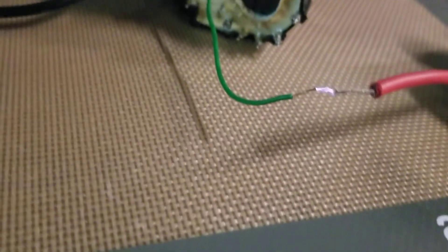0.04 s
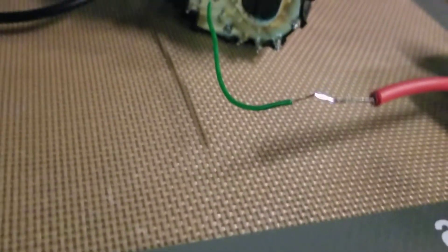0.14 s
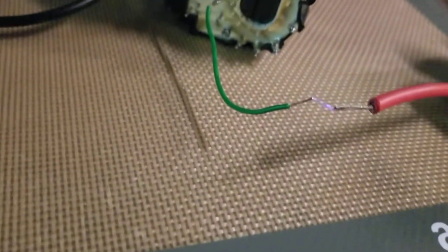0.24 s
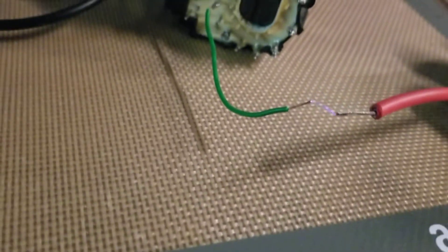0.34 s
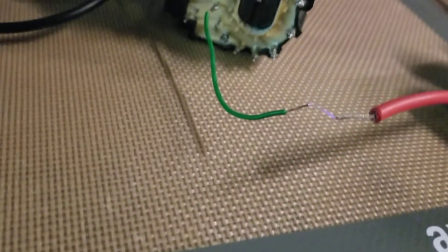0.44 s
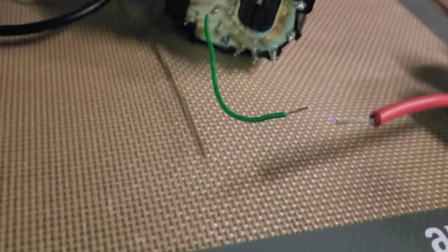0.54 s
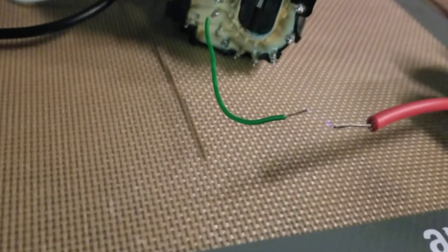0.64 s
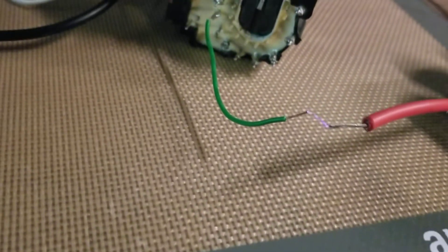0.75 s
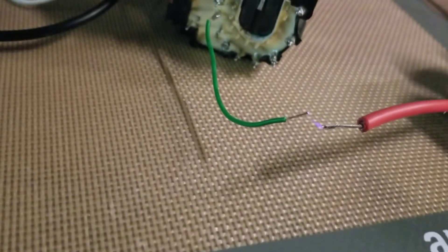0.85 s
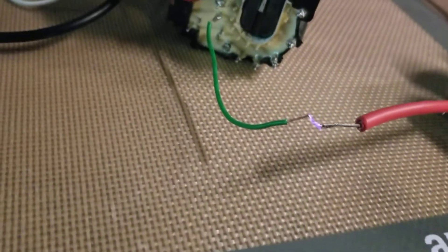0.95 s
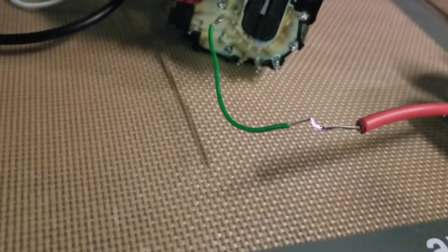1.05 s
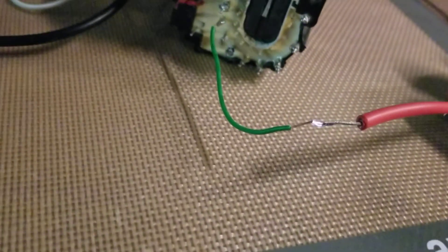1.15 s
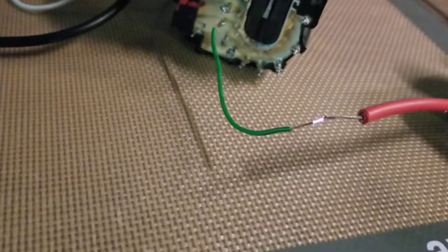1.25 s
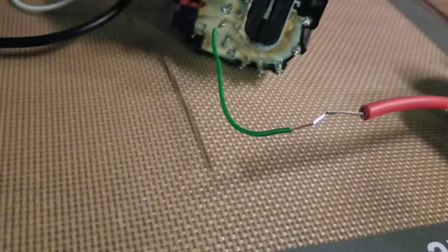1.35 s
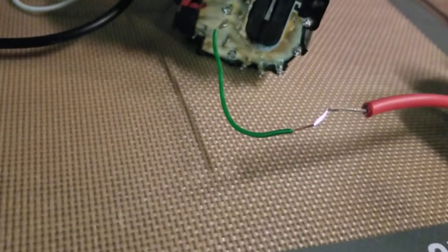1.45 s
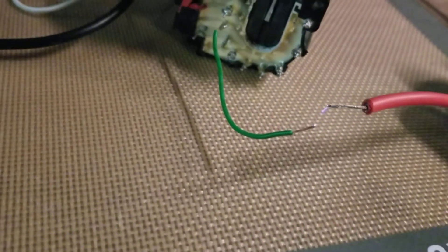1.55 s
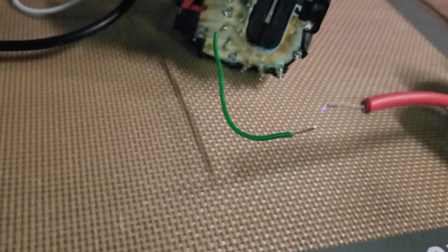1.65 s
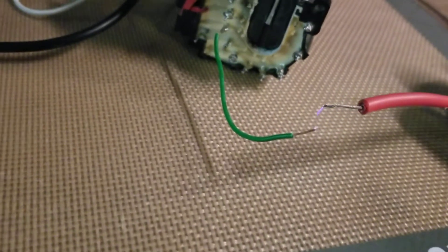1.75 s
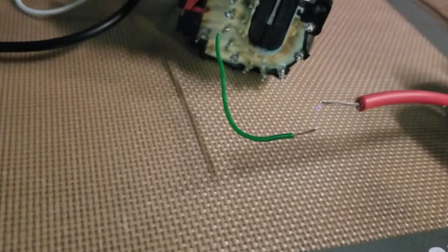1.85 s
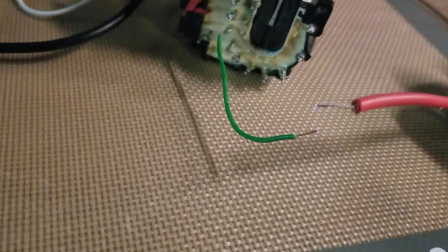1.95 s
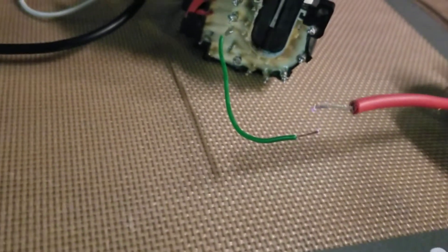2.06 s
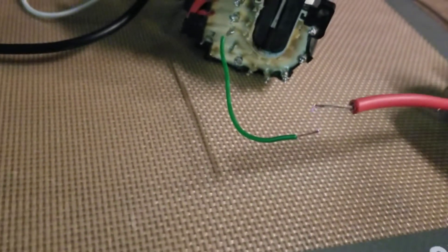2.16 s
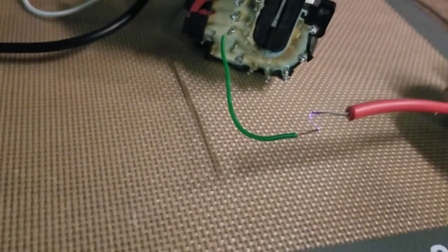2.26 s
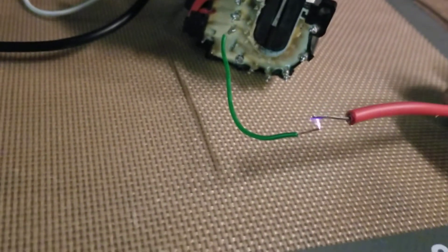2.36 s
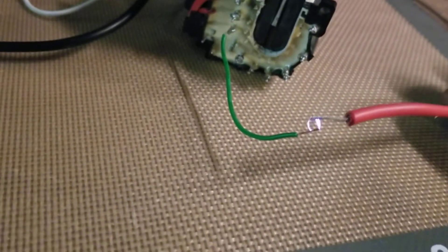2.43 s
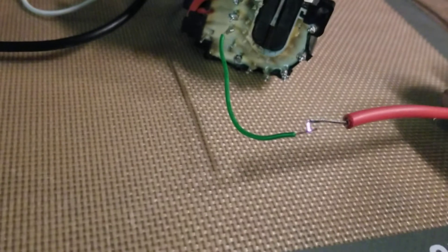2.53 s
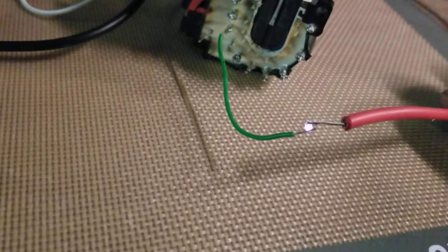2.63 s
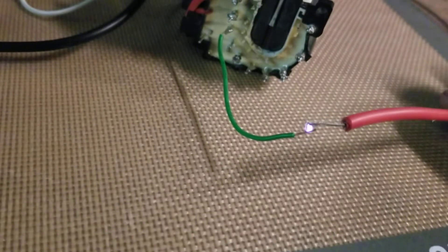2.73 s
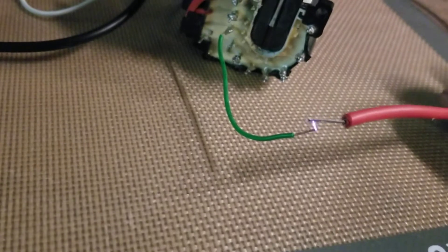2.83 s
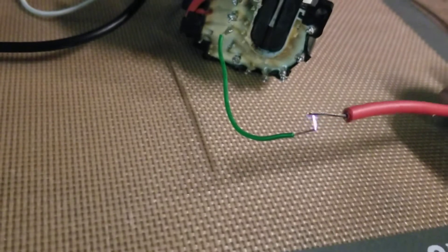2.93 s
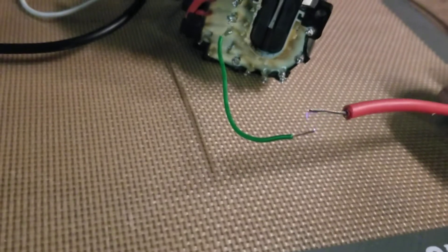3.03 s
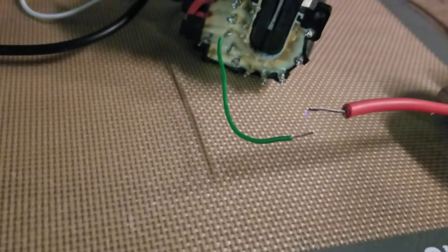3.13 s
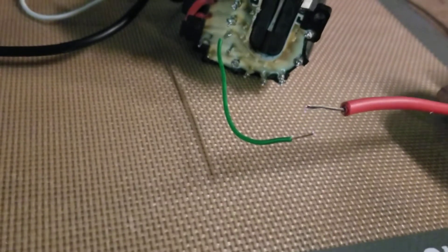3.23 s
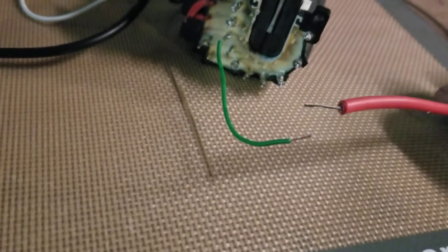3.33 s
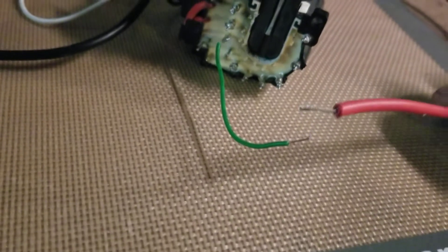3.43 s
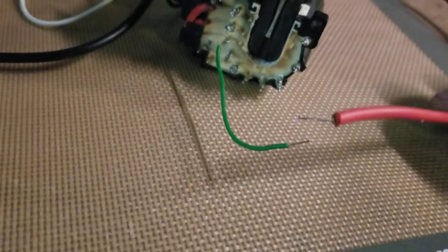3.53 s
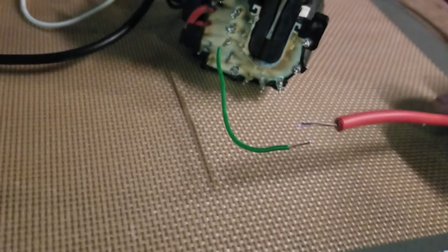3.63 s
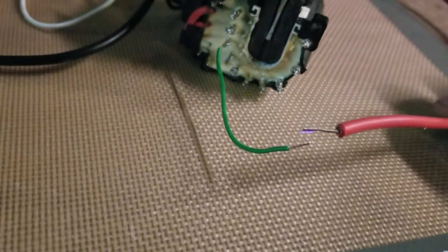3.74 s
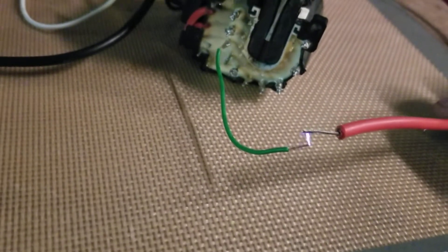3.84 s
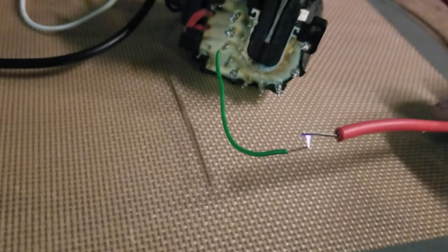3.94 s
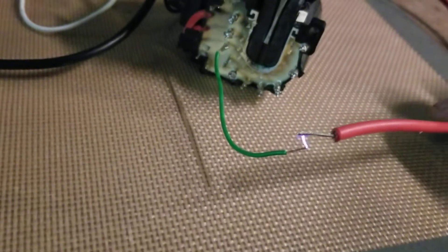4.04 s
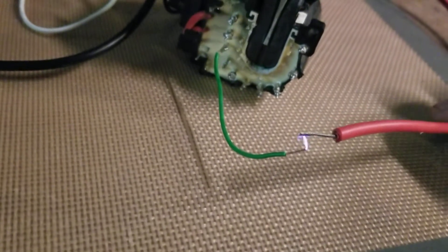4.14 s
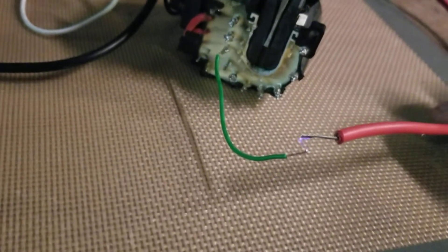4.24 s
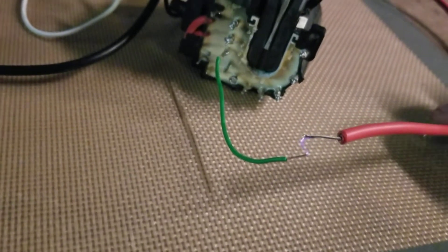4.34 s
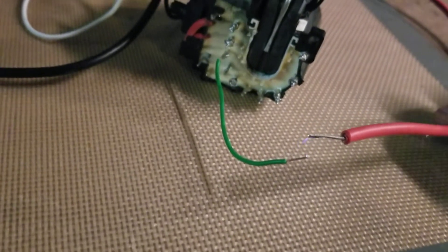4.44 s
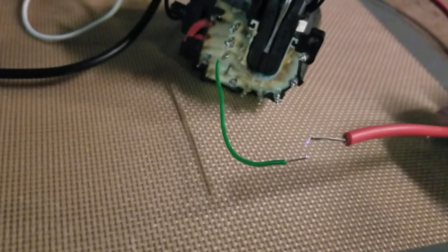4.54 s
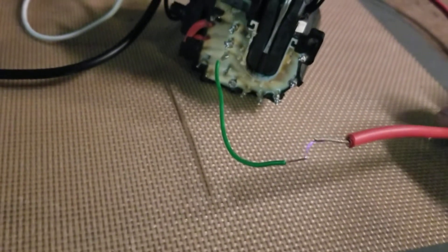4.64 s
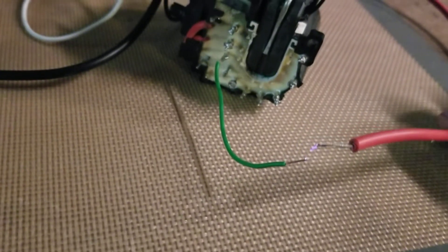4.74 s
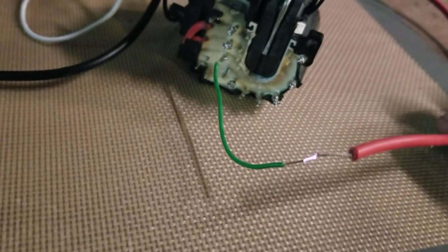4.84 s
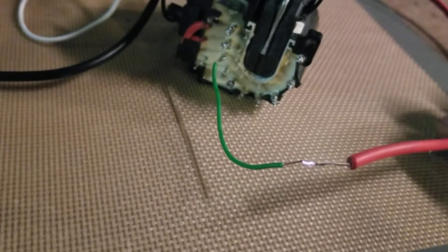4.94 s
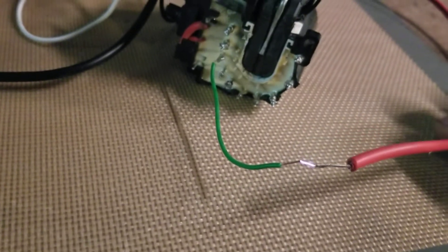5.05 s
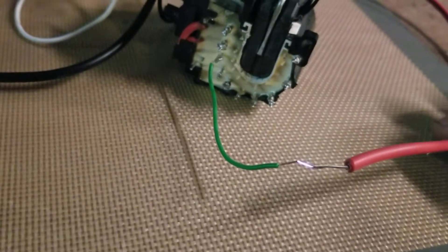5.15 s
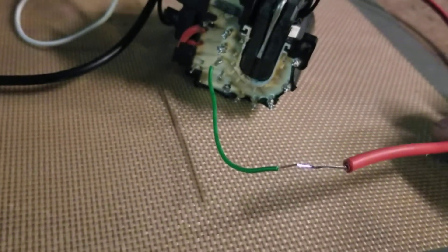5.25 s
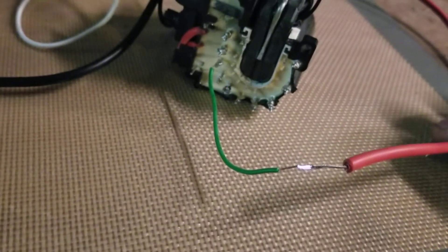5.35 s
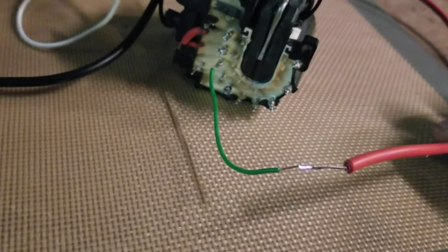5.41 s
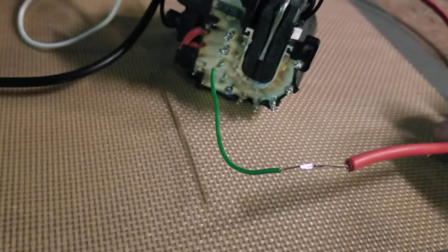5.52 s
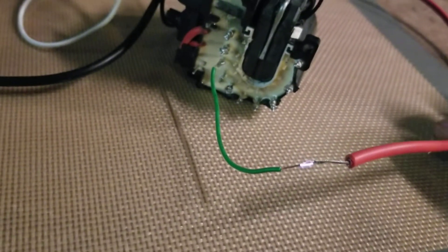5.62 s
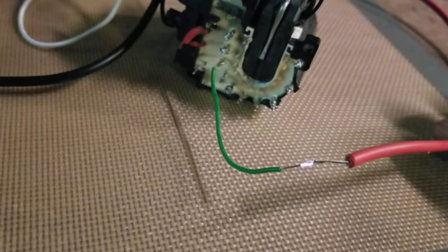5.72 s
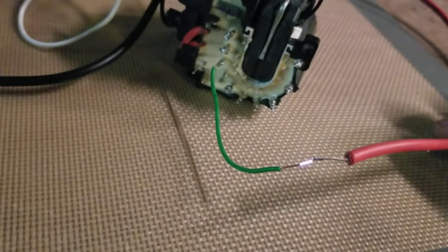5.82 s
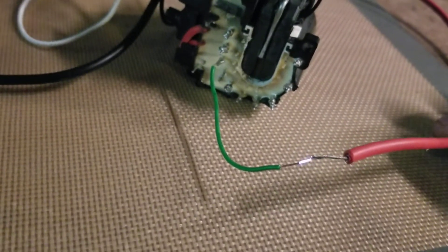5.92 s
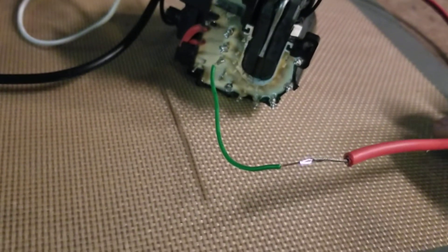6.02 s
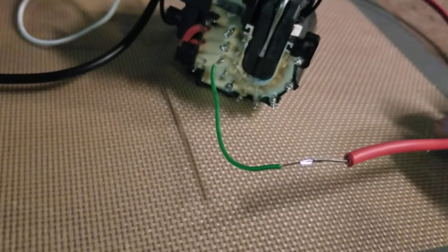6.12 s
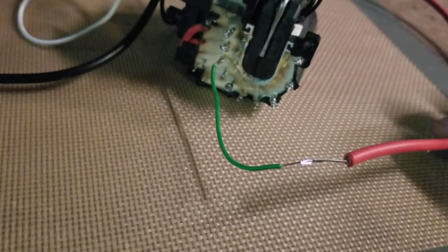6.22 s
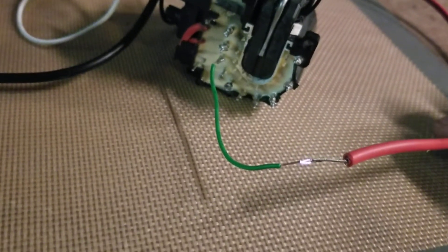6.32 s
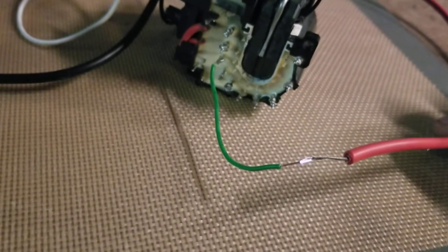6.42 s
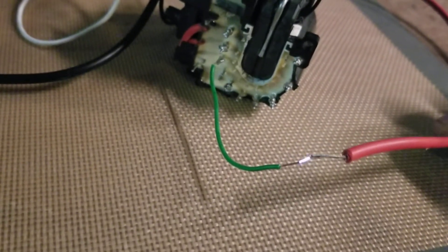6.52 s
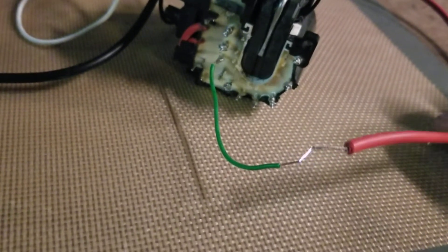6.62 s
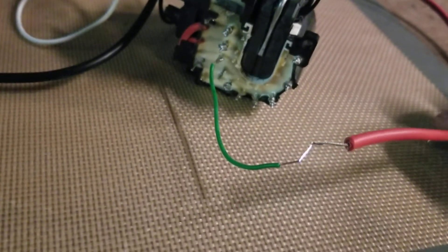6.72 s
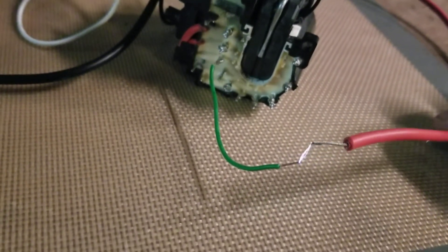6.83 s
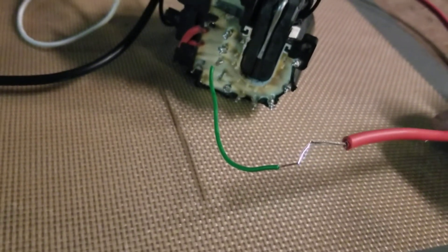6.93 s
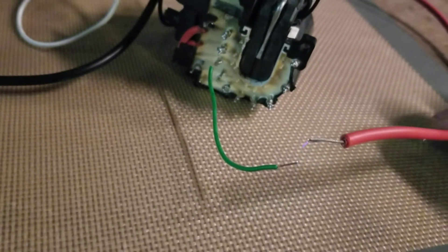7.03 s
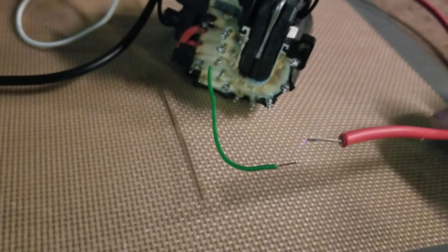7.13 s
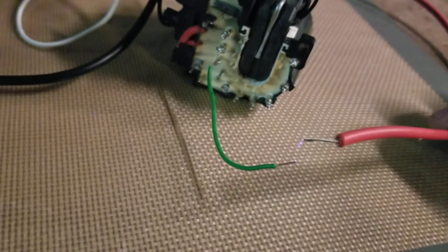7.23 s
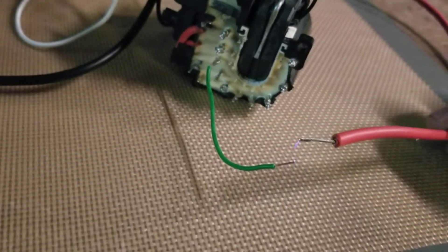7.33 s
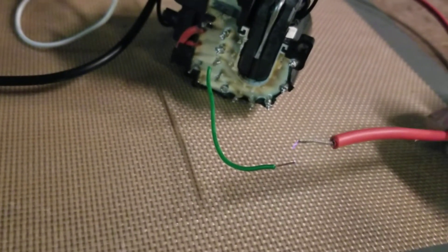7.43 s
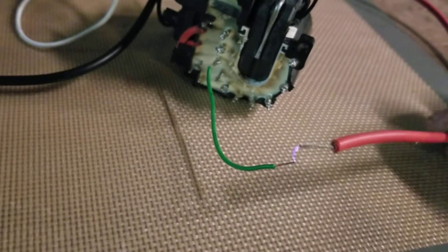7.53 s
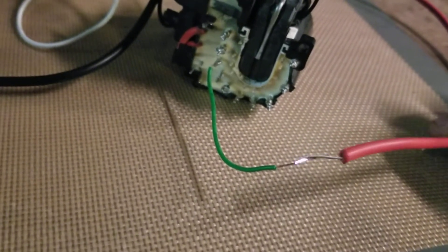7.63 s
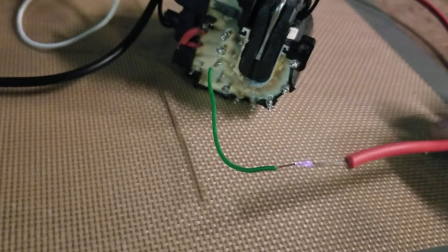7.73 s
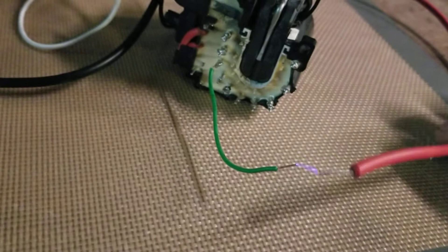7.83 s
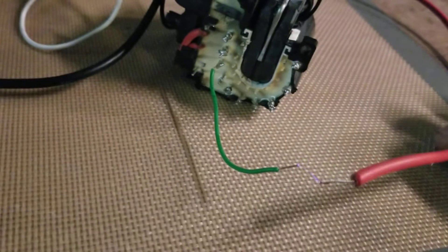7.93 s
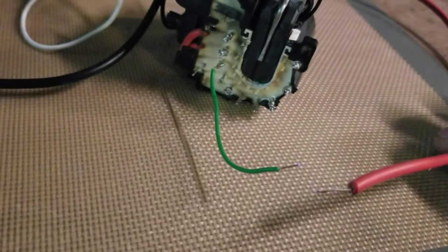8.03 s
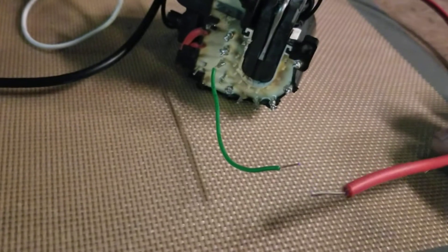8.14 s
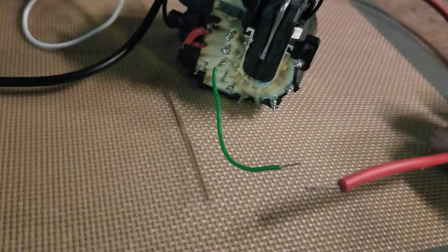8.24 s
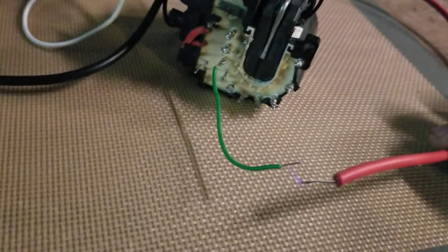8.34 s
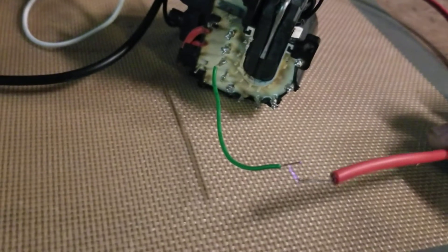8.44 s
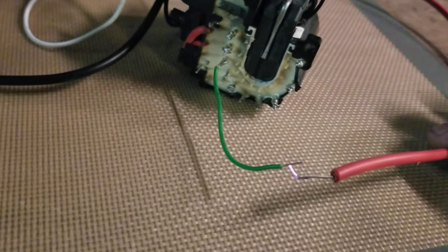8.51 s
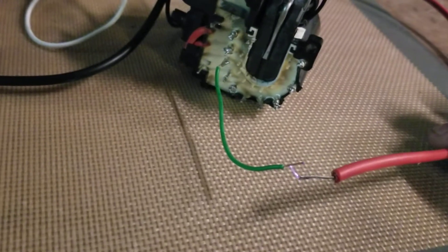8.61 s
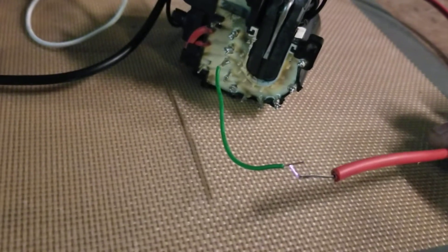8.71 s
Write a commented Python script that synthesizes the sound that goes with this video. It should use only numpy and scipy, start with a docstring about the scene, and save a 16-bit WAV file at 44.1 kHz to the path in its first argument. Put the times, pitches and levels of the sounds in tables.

```python
"""From the start a cooling fan hums in a small room: wavering tones and a swelling drone over rushing air.
A flyback transformer throws an arc between two wire ends, one moved by hand: two short burns come first.
Longer burns follow, the longest a little past halfway, then short ones. Each is a train of tiny sparks that
builds up, holds, sometimes sags and dies; its spark rate glides with the gap. Between and around the burns,
puffs of corona hiss. Stray sparks jump from strong corona, and single snaps come from about 4 s to the end."""
import sys
import numpy as np
from scipy import signal
from scipy.fft import rfft, irfft, next_fast_len
from scipy.io import wavfile
from scipy.ndimage import map_coordinates

SR = 44100
rng = np.random.default_rng(int(sys.argv[2]) if len(sys.argv) > 2 else 0)


def log_audio(samples):
    """Write samples as a 16-bit WAV file to the path given in sys.argv[1]."""
    # one column per channel
    frames = np.atleast_2d(samples).T
    # limit to full scale, then quantise
    limited = np.clip(frames, -1, 1)
    pcm = np.round(limited * 32767).astype(np.int16)
    wavfile.write(sys.argv[1], SR, pcm)


N = 386757


def amp(db):
    """Turn decibels into a gain."""
    return 10 ** (np.asarray(db) / 20)


def unit(x):
    """Scale x to an rms (average strength) of 1."""
    return x / np.sqrt(np.mean(x ** 2) + 1e-20)


def along(points, hz, axis=1):
    """Read one column of a frequency table, with frequency on a log scale."""
    table = np.transpose(points)
    return np.interp(np.log(hz + 1), np.log(table[0] + 1), table[axis])


def both_ears(points, hz):
    """Left and right gains from a table of f/Hz, left/dB, right/dB."""
    return amp([along(points, hz, axis=1), along(points, hz, axis=2)])


def curves(rows):
    """Join the points of each column after the time into one value per sample."""
    s, *columns = np.transpose(rows)
    t = np.arange(N) / SR
    return [np.interp(t, s, column) for column in columns]


def wobble(rate):
    """A smooth random curve around 0, drawn through `rate` random points a second."""
    points = rng.standard_normal(N // 16)
    return map_coordinates(points, [np.arange(N) * rate / SR], mode="wrap")


def filtered(x, response):
    """Shape the spectrum of x by a response that is a function of frequency."""
    size = next_fast_len(N + SR // 4)  # spare room, so that the end does not wrap onto the start
    spectrum = rfft(x, size) * response(np.fft.rfftfreq(size, 1 / SR))
    return irfft(spectrum, size)[..., :N]


def passband(hz, top_hz=15930):
    """Full gain up to the band limit, then a steep fall."""
    return 1 / (1 + (hz / top_hz) ** 300)


def pulses(times, sizes, size=8):
    """Band-limited impulses that may fall between samples."""
    at = np.asarray(times)[:, None] * SR
    index = np.floor(at).astype(int) + np.arange(1 - size, size + 1)
    window = np.cos(np.pi * (index - at) / (2 * size)) ** 2
    shape = np.sinc(index - at) * window
    # impulse parts outside the scene pile up at its edges; the spare last slot is cut off
    return np.bincount(np.clip(index, 0, N).ravel(), (shape * sizes[:, None]).ravel(), N + 1)[:N]


def bump(t, centre_s, length_s):
    """A smooth rise to 1 and back, length_s wide at half height."""
    return .5 ** ((2 * (t - centre_s) / length_s) ** 2)


def tone(hz, width_hz, waver_db=2.47):
    """A hum line of rms 1: a sine that wavers in pitch and level."""
    phase = np.cumsum(hz + width_hz / 2 * wobble(8)) / SR
    level = amp(waver_db * wobble(6.5))
    return unit(level * np.sin(2 * np.pi * phase))


def drone(drift_db=1.0):
    """Two low tones that drift in level and now and then swell or dip."""
    # the tones at rest, before the fan mixes them: f/Hz, level/dB, width/Hz
    low_tones = [(70.8, -59.5, 3.33), (138.5, -57.5, 7.95)]
    # level changes, down where negative: t/s (middle), length/s, lower tone/dB, upper tone/dB
    swells = [(1.25, 0.39, 0, 7.5), (2.037, 0.21, 14, 4), (2.87, 0.17, -4, 7), (4.4, 0.43, 11, 5.5),
              (5.1, 0.33, 10, 8.5), (5.65, 0.27, 9, -10), (8.397, 0.56, 5, 5.5)]
    t = np.arange(N) / SR
    swell_db = sum(np.outer(rises_db, bump(t, s, length)) for s, length, *rises_db in swells)
    total = 0
    for (hz, db, width), rise_db in zip(low_tones, swell_db):
        total = total + amp(db + rise_db + drift_db * wobble(3.11)) * tone(hz, width)
    return total


def fan(air_db=-49.5, drone_db=-2, left_db=3.0):
    """Steady fan and supply tones and a swelling low drone over rushing air, stronger on the left."""
    # fan and supply tones, before the left-right balance: f/Hz, level/dB, width/Hz
    hum_tones = [(150.3, -60, 6.7), (228, -56.5, 3.58), (384, -55, 1), (451.6, -69.5, 3), (626.6, -69, 8.3)]
    # colour of the moving air, only relative: f/Hz, level/dB (per Hz)
    air_colour = [(22, -24), (40, -11), (54, 0.5), (80, -2.5), (108, -6.5), (190, -6), (310, -1.5),
                  (350, -5.5), (520, -8), (1000, -15.5), (1900, -13.5), (3200, -27.5), (6500, -36),
                  (9500, -47.5), (15500, -43.5)]
    # how alike the air is on the left and right: f/Hz, likeness (1 = the same, 0 = unrelated)
    likeness = [(60, 0.99), (180, 1), (550, 0.28), (1650, 0), (15000, 0.00083)]

    def mid_and_side(hz):
        angle = np.arccos(np.clip(along(likeness, hz), -1, 1)) / 2
        return amp(along(air_colour, hz)) * [np.cos(angle), np.sin(angle)]

    mid, side = filtered(rng.standard_normal((2, N)), mid_and_side)
    air = amp(air_db) * unit(np.array([mid + side, mid - side]))
    hum = sum(amp(db) * tone(hz, width) for hz, db, width in hum_tones)
    balance = amp([[left_db], [-left_db]])
    return (air + hum + amp(drone_db) * drone()) * balance


def corona_strength(attack_s=0.022, release_s=.022):
    """Strength of the corona at the wire tips: every puff rises, holds and dies away alike."""
    # puffs of corona, before the hiss sets its level: t/s (start), length/s, level/dB
    puffs = [(-.03, 0.091, -47.5), (0.178, 0.29, -67), (0.668, 0.25, -67), (1.66, 0.075, -69.5),
             (2.053, 0.045, -62.5), (2.167, 0.17, -63.5), (2.95, 0.077, -67), (4.22, 0.16, -58.5),
             (4.5, 0.16, -64.5), (7.423, .1, -64.5), (7.72, .14, -63.5), (8.14, 0.047, -70),
             (8.285, .18, -57), (8.454, .32, -47)]
    t = np.arange(N) / SR
    total = 0
    for start, length, db in puffs:
        rise = np.clip((t - start) / attack_s, 0, 1)
        fade = np.exp(-np.clip((t - start - length) / release_s, 0, 20))
        total = total + amp(db) * rise * fade
    return total


def corona(strength, level_db=2, flutter_db=2):
    """Countless weak discharges into the air merge into a fluttering hiss."""
    # colour of the hiss, only relative: f/Hz, left/dB, right/dB
    hiss_colour = [(400, -27, -45), (1530, 0, -25), (4000, -12, -15), (7500, -18, -17), (8900, -20.5, -23),
                   (10900, -8.5, -21), (12900, -6.5, -13), (14200, -6, -14), (15600, -3, -6)]
    noise = rng.standard_normal((2, N))
    hiss = unit(filtered(noise, lambda hz: both_ears(hiss_colour, hz) * passband(hz)))
    return amp(level_db) * strength * unit(hiss * amp(flutter_db * wobble(900)))


def burn_level(t, start, stop, rise_s, fall_s, first_db, last_db, edge_db=8.5):
    """Burn level in dB at times t: a build-up from edge_db down, a sloping plateau with sags, a fade."""
    # the arc weakens for a moment: t/s (middle), length/s, depth/dB
    sags = [(1.4, 0.11, 4), (2.637, 0.18, 4), (4.068, 0.14, 5.5), (5.125, 0.12, 4), (5.809, 0.02, 5),
            (6.6, 0.065, 4)]
    edges = np.exp(-np.abs(t - start) / rise_s) + np.exp(-np.abs(stop - t) / fall_s)
    sag_db = sum(depth_db * bump(t, s, length) for s, length, depth_db in sags)
    plateau_db = np.interp(t, [start, stop], [first_db, last_db])
    return plateau_db - edge_db * edges - sag_db


def spark_times(start, stop, rate, scatter, count=5000):
    """The gap recharges and breaks down again, each time a little early or late."""
    chance = rng.standard_normal(count)
    t = np.arange(round(start * SR), min(round(stop * SR), N))
    cycles = np.cumsum(rate[t]) / SR
    spread = np.interp(np.arange(count), cycles, scatter[t])
    steps = np.exp(spread * chance - spread ** 2 / 2)  # intervals in cycles, 1 on average
    fired = np.cumsum(steps) - steps[0]
    return np.interp(fired[fired < cycles[-1]], cycles, t / SR)


def crack(hz, bounce_s=0.000251, bounce=0.49):
    """Left and right response to one spark: its colour, a bounce off the bench and a brief ring."""
    # colour of one spark, only relative: f/Hz, left/dB, right/dB
    spark_colour = [(100, -52, -41), (602, -19.5, -31), (810, -17, -26.5), (1150, -18.5, -31),
                    (1510, -16.5, -29.5), (2030, -11.5, -27), (2480, -13.5, -25), (3110, -22, -28),
                    (3970, -20, -18.5), (4350, -12, -25.5), (4820, -17.5, -26), (6700, -14.5, -11),
                    (8320, -9, -15), (9500, -20, -14.5), (10640, -5.5, -19.5), (12400, -0.5, -12),
                    (14300, -0.5, -14), (14600, 4, -3)]
    # treble timing between left and right: f/Hz, lead of the left/radians
    left_lead = [(2900, 1), (4100, -3), (5300, -5), (6400, -5), (7000, -4), (8400, -4), (10000, -0.5),
                 (11100, -3), (12000, -1), (13300, -2), (14100, -1.4)]
    # the wave bounces between wires and mat: spread in time, its colour left alone
    delay = np.exp(-2j * np.pi * hz * bounce_s)
    spread = (delay - bounce) / (1 - bounce * delay)
    # something on the bench rings briefly and lifts the whistle as it glides past
    ring_hz, width_hz, ring_gain = 1490, 130, 1.9
    ring = 1j * hz * width_hz / (ring_hz ** 2 - hz ** 2 + 1j * hz * width_hz)
    turn = np.exp(1j * along(left_lead, hz) / 2)
    colour = both_ears(spark_colour, hz) * passband(hz)
    return colour * spread * (1 + ring_gain * ring) * [turn, 1 / turn]


def radiate(sizzle, body, split_hz=11200):
    """Each impulse becomes a crack; its top (sizzle) and its body keep their own strengths."""
    def high(hz):
        return 1 / (1 + (split_hz / (hz + 1)) ** 20)

    def even(response):  # average strength 1
        return response / np.sqrt(np.mean(np.abs(response) ** 2))

    top = filtered(sizzle, lambda hz: even(crack(hz) * high(hz)))
    return top + filtered(body, lambda hz: even(crack(hz) * (1 - high(hz))))


def lone_sparks(strength, strays_per_s=160, stray_db=-38, count=2000):
    """Single loud snaps, and weak strays that grow likelier and larger with the corona."""
    # lone snaps, before the arc sets their level: t/s, impulse size/dB
    snaps = [(4.297, -31), (4.3004, -20), (4.3033, -20), (7.7445, -27), (7.763, -27), (8.532, -25),
             (8.57, -29), (8.6264, -26), (8.6355, -26), (8.684, -27), (8.6998, -25), (8.704, -24),
             (8.7176, -26)]
    share = strength / strength.max()
    due = np.cumsum(strays_per_s * share ** 2) / SR  # strays expected so far
    fired = np.cumsum(-np.log(1 - rng.random(count)))  # random waits, 1 on average
    at = np.searchsorted(due, fired[fired < due[-1]])
    strays = pulses(at / SR, share[at] * amp(stray_db))
    s, size_db = np.transpose(snaps)
    return pulses(s, amp(size_db)) + strays


def arc(strength, sizzle_db=1.56, body_db=3.5, snap_db=10, snap_body_db=-7, size_scatter_db=2.5):
    """Trains of sparks and lone snaps; the slower the train, the more charge in each spark."""
    # burns, before sizzle_db and body_db are added: start t/s, end t/s, rise/s, fall/s,
    # first level/dB, last level/dB, body above the sizzle/dB
    burns = [(0, 0.062, .001, .002, -48, -52.5, -1.5), (.069, .205, .003, .004, -41, -39, -1.5),
             (1.041, 1.525, .003, 0.0053, -40, -35, -3.5), (2.349, 2.968, 0.0011, 0.035, -39, -38.5, -2.5),
             (3.762, 4.159, 0.043, 0.0024, -35.5, -35, -5.5),
             (4.806, 6.979, 0.0026, 0.028, -32.5, -36, -7.5), (7.547, 7.683, 0.0044, 0.027, -34, -34.5, -8),
             (8.467, 8.505, .002, .012, -38.5, -33, -7.5), (8.727, 8.774, .005, 0.0017, -35, -35, -8)]
    # the spark rate follows the gap, one list for each burn: t/s, rate/(sparks a second)
    glides = [
        [(0, 350)],
        [(.072, 1050), (.1, 910), (.2, 800)],
        [(1.045, 930), (1.085, 1490), (1.13, 1570), (1.195, 1980), (1.235, 1560), (1.3, 1420), (1.33, 1070),
         (1.42, 770), (1.525, 600)],
        [(2.41, 1200), (2.465, 2400), (2.505, 1770), (2.595, 3400), (2.64, 2450), (2.71, 2400), (2.76, 1620),
         (2.92, 730)],
        [(3.8, 900), (3.86, 980), (3.875, 1240), (3.925, 1340), (3.985, 780), (4.07, 1070), (4.155, 850)],
        [(4.87, 1070), (4.93, 770), (5.01, 735), (5.06, 530), (5.15, 490), (5.19, 720), (5.24, 740),
         (5.33, 1240), (5.4, 1030), (5.58, 1620), (5.66, 1290), (5.9, 1040), (6.42, 1090), (6.53, 1360),
         (6.59, 544), (6.67, 315), (6.9, 240), (6.97, 130)],
        [(7.55, 600), (7.63, 1070), (7.68, 620)],
        [(8.467, 290), (8.49, 560)],
        [(8.73, 430), (8.77, 690)],
    ]
    # a steady arc whistles, a restless one hisses: t/s, scatter of the intervals/share
    restless = [(.06, .6), (.072, .07), (1.2, .105), (1.45, .085), (2.48, .06), (2.6, .14), (2.95, .18),
                (3.77, .06), (4.15, .075), (4.86, .22), (4.93, .055), (5.33, .07), (5.51, .15),
                (5.55, .035), (5.6, .035), (5.65, .21), (6.75, .18), (7.6, .23)]
    largest_size = 1.4  # the gap holds only so much charge: standard deviations above the usual size
    body_follows = 0.86  # share of the sizzle's swings in dB that the body follows
    lag_s = 35e-6
    tremor_share, tremor_rate = .018, 45  # the arc dances: share of the spark rate, points a second

    scatter, = curves(restless)
    tremor = np.exp(tremor_share * wobble(tremor_rate))
    sizzle, body = np.zeros(N), np.zeros(N)
    for (start, stop, rise_s, fall_s, first_db, last_db, rel_db), glide in zip(burns, glides):
        rate = curves(glide)[0] * tremor
        times = spark_times(start, stop, rate, scatter)
        size, lag = rng.standard_normal((2, len(times)))
        size = np.minimum(size, largest_size)
        plateau_db = (first_db + last_db) / 2
        swing_db = burn_level(times, start, stop, rise_s, fall_s, first_db, last_db) - plateau_db
        rate_gain = np.sqrt(SR / rate[(times * SR).astype(int)])
        charge = amp(plateau_db + size_scatter_db * size) * rate_gain
        # each breakdown shifts a little by chance, which blurs the upper overtones
        times = times + lag_s * lag
        sizzle += pulses(times, charge * amp(sizzle_db + swing_db))
        body += pulses(times, charge * amp(body_db + rel_db + body_follows * swing_db))
    snaps = amp(snap_db) * lone_sparks(strength)
    return radiate(sizzle + snaps, body + amp(snap_body_db) * snaps)


def room(x, near_db=-8, near_t60=0.026, tail_db=-15):
    """Things on the bench answer within milliseconds, then the walls ring briefly."""
    # how long the walls ring: f/Hz, time to fall by 60 dB/s
    ring_times = [(300, 0.19), (3000, 0.23), (8000, 0.08), (15000, 0.098)]
    hz, t, z = signal.stft(rng.standard_normal((2, SR // 2)), SR, nperseg=256)
    fading = z * amp(-60 * t / along(ring_times, hz)[:, None])
    tail = signal.istft(fading, SR, nperseg=256)[1]
    t = np.arange(tail.shape[1]) / SR
    near = rng.standard_normal(tail.shape) * amp(-60 * t / near_t60) * (t > .0008)
    walls = tail * (t > .004)
    # dividing by sqrt(len(t)) makes the levels compare with the direct sound
    answer = (amp(near_db) * unit(near) + amp(tail_db) * unit(walls)) / np.sqrt(len(t))
    return x + signal.fftconvolve(x, answer, axes=1)[:, :N]


def scene():
    """Arc and corona in the room, over the fan."""
    strength = corona_strength()
    return room(arc(strength) + corona(strength)) + fan()


def record(dry):
    """Keep almost nothing above the band limit."""
    return filtered(dry, passband)


dry = scene()
out = record(dry)
log_audio(out)
```